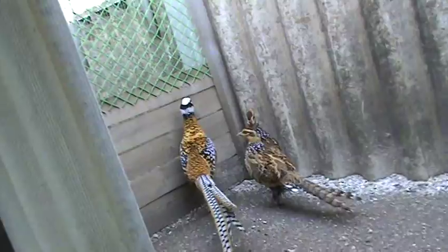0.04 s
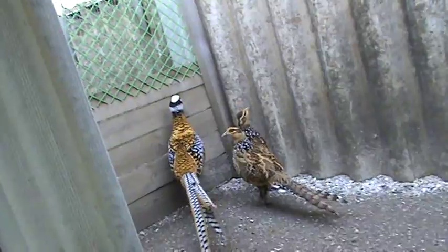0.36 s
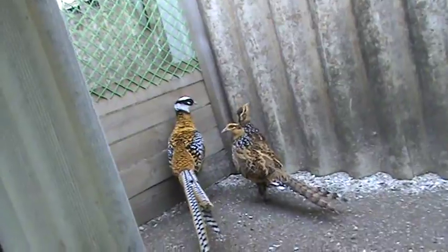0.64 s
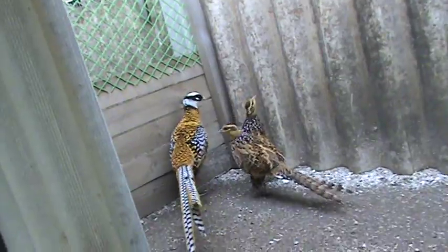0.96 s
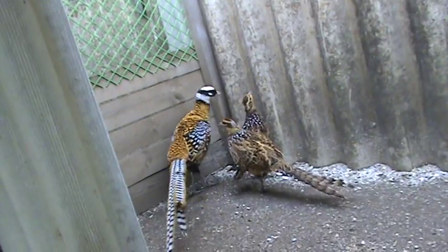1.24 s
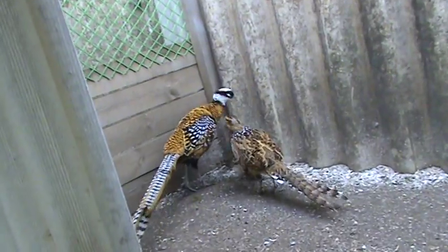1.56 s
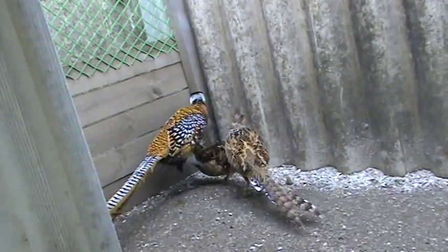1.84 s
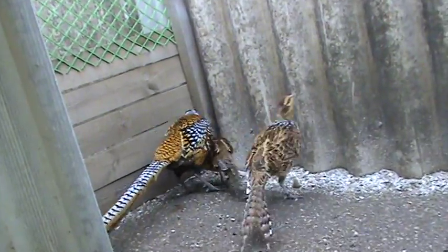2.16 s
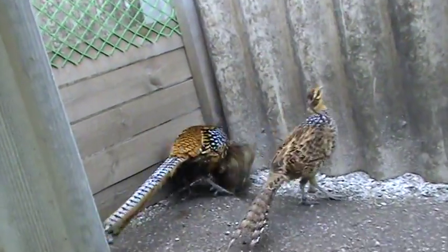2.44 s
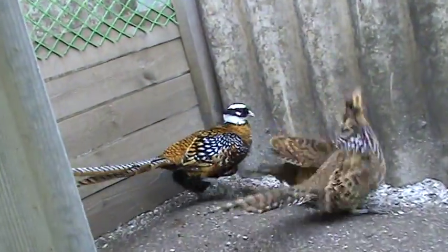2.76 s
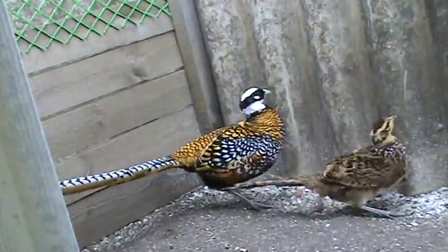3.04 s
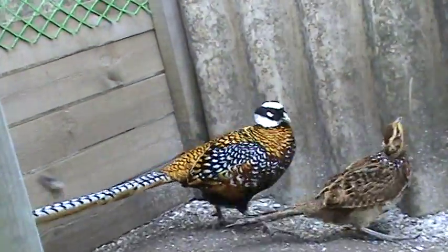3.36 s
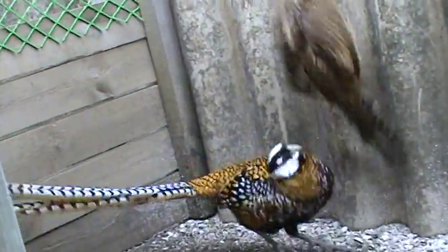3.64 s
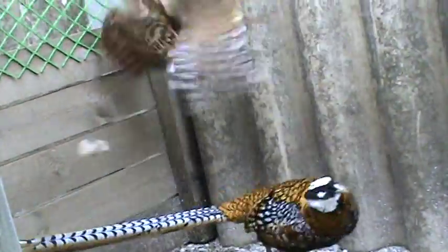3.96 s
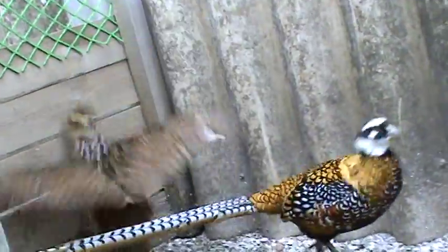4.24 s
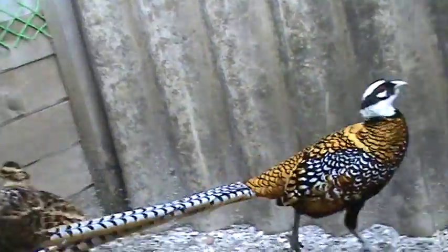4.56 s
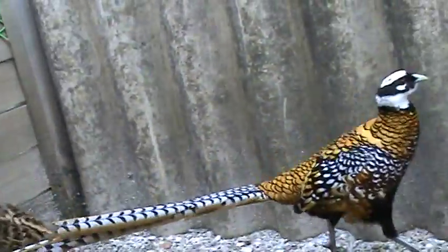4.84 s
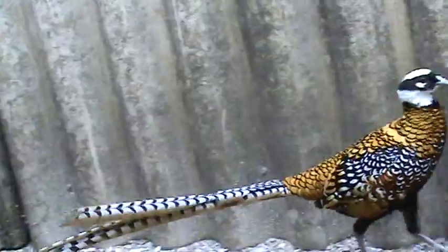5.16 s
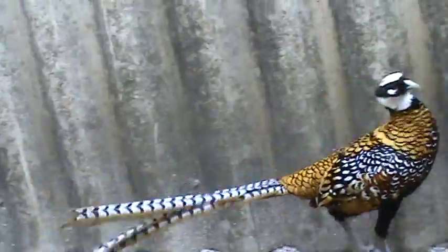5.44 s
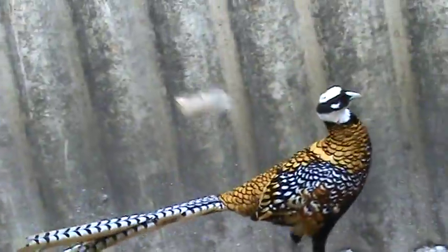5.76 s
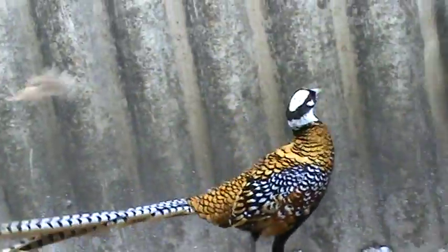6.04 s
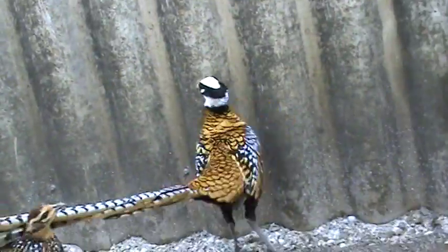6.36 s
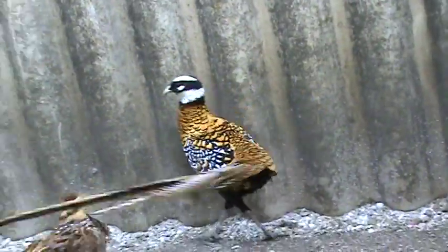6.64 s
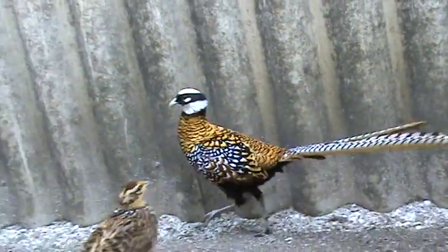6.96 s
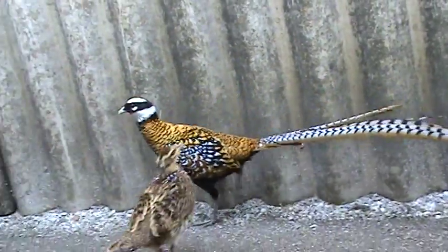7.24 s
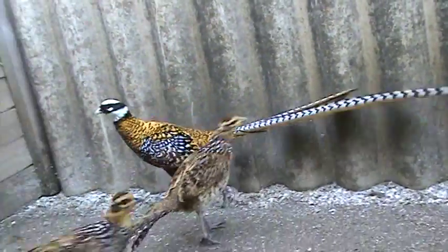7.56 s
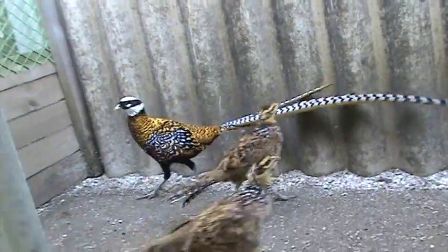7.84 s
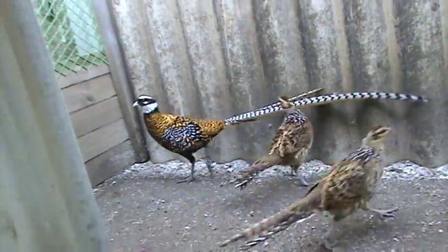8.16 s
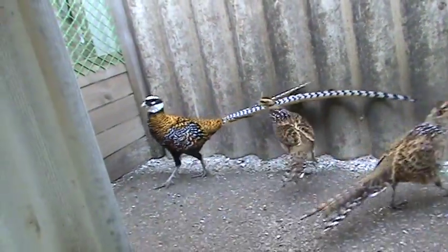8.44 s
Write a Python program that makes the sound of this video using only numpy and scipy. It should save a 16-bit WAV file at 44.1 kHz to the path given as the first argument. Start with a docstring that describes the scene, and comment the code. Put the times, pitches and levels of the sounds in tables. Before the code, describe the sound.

Over quiet outdoor background noise, a few low pheasant clucks and light gritty steps are heard close by. Then wings burst into beating, feathers brushing and knocking dully against board and sheet walls while the birds whine and squeal. As the scuffle dies down, a run of shrill, whistling alarm chirps takes over and continues to the end, each echoing briefly in the small pen.

```python
"""Pheasants call and scuffle in a small pen of boards and corrugated sheet. After soft coos, clucks and
steps on grit a hen flies up, wings beating against the walls, and ragged whines give way to a run of
sharp alarm chirps. Each chirp is one whistle of the syrinx that shoots up, drops to a low note and flicks
up again; the close walls ring with it. Wings and claws are shaped noise, the struck wall a short boom of
its modes, all over a faint outdoor bed."""
import sys
import numpy as np
from scipy import signal
from scipy.fft import rfft, irfft, next_fast_len
from scipy.io import wavfile
from scipy.ndimage import uniform_filter1d, minimum_filter1d, map_coordinates

SR = 44100
rng = np.random.default_rng(int(sys.argv[2]) if len(sys.argv) > 2 else 0)


def dump_mix(stems):
    """Bounce the given channels to the path in sys.argv[1] as a 16-bit WAV at rate SR."""
    frames = np.atleast_2d(stems).T  # one column per channel
    limited = np.clip(frames, -1, 1)  # hard clip at full scale
    pcm = np.round(limited * 32767).astype(np.int16)
    wavfile.write(sys.argv[1], SR, pcm)


N = 378819
BAND_LIMIT_HZ = 15950


def amp(db):
    """Decibels to gain."""
    return 10 ** (np.asarray(db) / 20)


def along(points, hz):
    """A curve of (Hz, value) points, read on a log frequency axis."""
    freqs, values = np.transpose(points)
    return np.interp(np.log(hz + 1), np.log(freqs + 1), values)


def wobble(rate, n):
    """A smooth random curve, rate knots a second."""
    return map_coordinates(rng.standard_normal(int(n * rate / SR) + 4), [np.arange(n) * rate / SR])


def filtered(x, response):
    """Shapes x with a frequency response."""
    n = x.shape[-1]
    size = next_fast_len(n + 4096)
    return irfft(rfft(x, size) * response(np.fft.rfftfreq(size, 1 / SR)), size)[..., :n]


def noise(spectrum, n, grain_db=0):
    """Coloured noise of rms 1; grain_db clumps it into tiny crackles."""
    grains = rng.standard_normal(n) * amp(grain_db * wobble(900, n))
    coloured = filtered(grains, lambda hz: amp(along(spectrum, hz)))
    return coloured / np.sqrt(np.mean(coloured ** 2) + 1e-20)


def swells(rows, settle_db_per_s=80):
    """Envelope of overlapping swells: each rises, holds and settles."""
    t = np.arange(N) / SR
    each = [np.clip((t - start) / rise, 0, 1)
            * amp(db - settle_db_per_s * np.maximum(t - start - rise - hold, 0))
            for start, rise, hold, db in rows]
    return np.linalg.norm(each, axis=0)


def add(track, start_s, sound):
    """Mixes a sound into the track."""
    part = track[..., round(start_s * SR):][..., :sound.shape[-1]]
    part += sound[..., :part.shape[-1]]


# Reverb decay of the pen: freq_hz, t60_s
PEN_DECAY = [(150, 0.27), (500, 0.27), (1500, 0.32), (4500, 0.25), (8000, 0.19), (15000, 0.25)]


def in_pen(x, wet_db, side_db=-9, gap_s=0.0022, early_db=4, early_s=0.028):
    """Mid and side of a sound with fresh echoes for its spot; near walls answer first and loudest."""
    hz, t, spectra = signal.stft(rng.standard_normal((2, SR // 2)), SR, nperseg=256)
    decay = amp(early_db * np.exp(-(t / early_s) ** 2) - 60 * t / along(PEN_DECAY, hz)[:, None])
    tail = signal.istft(spectra * decay, SR, nperseg=256)[1]
    tail *= np.clip(np.arange(tail.shape[1]) / SR / gap_s - 1, 0, 1)
    tail *= amp(wet_db + np.array([[0], [side_db]])) / np.linalg.norm(tail[0])
    tail[0, 0] += 1  # direct sound
    return signal.fftconvolve(x[None], tail, axes=1)


def wide_noise(spectrum, side_db):
    """A noise bed as mid and side."""
    return np.array([noise(spectrum, N), amp(side_db) * noise(spectrum, N)])


# Fader moves of the outdoor bed: time_s, murmur_db, hiss_db
BED_LEVELS = [(0, -61, -70), (.6, -56, -65.5), (1.2, -57, -56), (1.7, -55, -54.5), (2.25, -54, -60.5),
              (5.8, -46.5, -51), (6.7, -49, -51.5), (7.5, -52.5, -56.5), (8.59, -50.5, -54.5)]
# Colours of the murmur and the hiss: freq_hz, density_db
MURMUR_COLOUR = [(40, -27), (70, 0.5), (110, -7.5), (160, -1.5), (220, -5), (330, 0.5), (600, -4),
                 (1000, -7.5), (1600, -10.5), (2500, -17.5), (4000, -24.5), (7000, -89)]
HISS_COLOUR = [(1470, -1), (2500, 1), (2830, -2.5), (3720, 1), (3980, 1), (10400, -9.5), (16000, -20)]


def outdoor_bed():
    """A low, drifting outdoor murmur under a faint hiss."""
    t = np.arange(N) / SR
    times, *levels_db = np.transpose(BED_LEVELS)
    murmur, hiss = [amp(np.interp(t, times, db, right=-120)) for db in levels_db]
    murmur *= amp(1.2 * wobble(9, N))
    return murmur * wide_noise(MURMUR_COLOUR, side_db=-23) + hiss * wide_noise(HISS_COLOUR, side_db=-7)


# Puffs of air on the microphone: start_s, rise_s, hold_s, relative_db
PUFFS = [(.48, 0.052, 0.25, -63), (3.45, 0.049, 0.084, -44), (4.42, 0.072, 0.11, -42),
         (4.97, 0.031, 0.18, -39), (5.82, 0.04, 0.065, -47.5), (6.28, 0.042, 0.04, -46)]
# Colour of their rumble: freq_hz, density_db
RUMBLE_COLOUR = [(11, -37), (18, 2), (140, 8), (180, -12), (310, -120)]


def draught():
    """Moving air rumbles on the microphone, most of it fanned by the wings."""
    fanned = amp(-40.5) * (swells(FLAPPING) / amp(FULL_EFFORT_DB)) ** 0.6
    calm = amp(-67.5)
    airflow = np.sqrt(fanned ** 2 + swells(PUFFS) ** 2 + calm ** 2)
    buffeting = amp(2 * wobble(12, N) - 1)
    return airflow * buffeting * wide_noise(RUMBLE_COLOUR, side_db=-6)


# Resonances of the windpipe and beak: freq_hz, gain_db
THROAT_EQ = [(300, 14), (700, -6.5), (950, -6), (1500, 0.5), (1900, -0.5), (2700, -6.5), (3500, -0.5),
             (4200, 4.5), (5500, -4.5), (6900, 0), (8000, 5), (9500, -6), (12000, -3), (15000, -19)]
# Colour of the rasp in the voice: freq_hz, density_db
RASP_COLOUR = [(700, -59), (1300, 4), (1900, 11), (2700, -2), (4300, 21.5), (5400, -10), (6400, -3),
               (7900, 11.5), (9500, -28), (12000, 4.5), (14000, -18), (16000, -30)]


def whistle(hz, rough, overtone_db, slope_db, flutter=0.109, rasp_db=-12, mellow_db=-8):
    """The syrinx: a tone with overtones through the throat; roughness shakes it and adds rasp."""
    n = len(hz)
    hz = hz * np.exp(flutter * rough * wobble(900, n))
    phase = 2 * np.pi * np.cumsum(hz) / SR
    pressure = np.clip(hz / 2200, 0, 1) ** 2  # low notes are blown softly and stay mellow
    harmonic = np.arange(1, 7)[:, None]
    rolloff_db = overtone_db + slope_db * (harmonic - 2) + mellow_db * (1 - pressure)
    level_db = along(THROAT_EQ, harmonic * hz) + (harmonic > 1) * rolloff_db
    tone = np.sum(amp(level_db) * (harmonic * hz < BAND_LIMIT_HZ) * np.sin(harmonic * phase), axis=0)
    rasp = amp(rasp_db) * rough * pressure * noise(RASP_COLOUR, n, grain_db=-17)
    return np.sqrt(2) * tone + rasp


# Soft coos and peeps: start_s, length_s, from_hz, to_hz, relative_db
COO_CUES = [(0.107, 0.04, 335, 293, -64), (.49, 0.06, 784, 760, -45), (0.586, 0.057, 350, 298, -55.5),
            (0.922, 0.055, 340, 295, -54), (1.308, 0.049, 322, 304, -55), (1.745, 0.14, 381, 464, -53.5),
            (1.818, 0.092, 1740, 1730, -54), (2.25, 0.047, 1485, 1680, -47.5),
            (6.661, 0.091, 770, 768, -33), (8.07, 0.12, 672, 634, -40), (8.17, 0.062, 2220, 2530, -40)]


def coos(waver=0.008):
    """Gently blown notes that glide, swell and fade."""
    out = np.zeros((2, N))
    for start, length, from_hz, to_hz, db in COO_CUES:
        progress = np.linspace(0, 1, round(length * SR))
        hz = (from_hz + (to_hz - from_hz) * progress) * np.exp(waver * wobble(135, len(progress)))
        voice = whistle(hz, rough=0.32, overtone_db=-16.5, slope_db=-4)
        envelope = np.sqrt(abs(np.sin(np.pi * progress))) * amp(db - 7.5)
        add(out, start, in_pen(voice * envelope, wet_db=-2.5))
    return out


# Claws and beaks on grit and boards, and hard bumps in flight: start_s, tick_db, knock_db
STEP_CUES = [(.241, -61, -45), (1.085, -51.5, -70), (1.533, -35, -42.5), (2.323, -45.5, -35.5),
             (2.438, -40, -39.5), (2.475, -29, -32), (4.3, -26, -35), (4.409, -33, -18.5),
             (4.789, -37, -30), (7.135, -58, -43), (8.404, -49, -42)]
# Bright scrape of claws and feathers: freq_hz, density_db
SCRAPE_COLOUR = [(200, -14), (800, 0), (1500, 1), (3000, -4.5), (5000, -4), (8000, -6), (12000, -12.5),
                 (16000, -20.5)]
# Dull body of knocks and of air pushed by wings: freq_hz, density_db
DULL_COLOUR = [(29, -48), (50, -30), (125, -5.5), (176, 5.5), (214, 0.5), (361, 1), (622, 1.5), (678, -2.5),
               (960, -2.5), (1800, -3.5), (9000, -23), (11700, -53), (19800, -120)]


def steps():
    """Each contact is a gritty tick with a dull knock under it."""
    out, t = np.zeros((2, N)), np.arange(SR // 8) / SR
    for start, tick_db, knock_db in STEP_CUES:
        tick = amp(tick_db) * noise(SCRAPE_COLOUR, len(t), grain_db=4) * np.exp(-t / 0.016)
        knock = amp(knock_db) * noise(DULL_COLOUR, len(t)) * np.exp(-t / 0.015)
        add(out, start, in_pen(tick + knock, wet_db=0))
    return out


USUAL_TOP_HZ = 5468  # a chirp that peaks higher lasts longer and has a louder crest


def chirp_contour(top_hz, low_hz, rise_db, rough):
    """The gesture of one chirp, as columns: share_of_length, pitch_hz, relative_db."""
    top_db = rise_db + 13.5 * np.log2(top_hz / USUAL_TOP_HZ) + 5 * (0.5 - rough)
    # the low note fades when it is very deep or the voice is rough
    low_db = rise_db + 1 + 28.5 * min(0, np.log2(low_hz / 562)) - 7.5 * rough
    flick_db = min(rise_db, top_db) - 5.5
    onset = [(-.42, .9 * low_hz, low_db - 31), (-.27, low_hz, low_db - 21), (-.18, 950, rise_db - 25)]
    rise = [(-.09, 1201, rise_db - 4), (0, min(1600, top_hz), rise_db - 5),
            (.06, min(1950, top_hz), rise_db - .5),
            (.125, max(.73 * top_hz, min(2100, top_hz)), top_db - 3.5)]
    crest = [(.2, .93 * top_hz, top_db - .5), (.3, top_hz, top_db), (.4, .93 * top_hz, top_db - 2.5)]
    drop = [(.48, min(1900, .806 * top_hz), top_db - 13), (.54, .97 * low_hz, low_db - 15.5)]
    low_note = [(.69, low_hz, low_db), (.82, 1.2 * low_hz, low_db - 14.5)]
    flick = [(.9, 1094, flick_db - 2), (.97, 1440, flick_db),
             (1.1, 1700, flick_db - 10), (1.3, 1490, flick_db - 44)]
    return np.transpose(onset + rise + crest + drop + low_note + flick)


# Clucks, then alarm chirps: start_s, top_hz, low_hz, relative_db, roughness (0-1)
CHIRP_CUES = [(.706, 1494, 581, -33, 0.26), (0.995, 1710, 601, -31.5, 0.48), (1.297, 1393, 583, -33, 0.25),
              (2.878, 1442, 604, -18.5, 0.37), (3.081, 3880, 590, -30.5, 0.55),
              (3.286, 4650, 618, -22, 0.26), (3.452, 5890, 1132, -26.5, 0.42),
              (4.456, 6900, 467.4, -17, 0.34), (4.639, 7090, 1298, -17.5, .4),
              (4.811, 7050, 1127, -16, 0.53), (4.951, 6840, 1287, -18.5, .6),
              (5.487, 6010, 371, -17.5, 0.61), (5.667, 5790, 637, -23, 0.62), (5.823, 6120, 490, -18, 0.48),
              (5.977, 5445, 367, -20.5, 0.41), (6.124, 6500, 406, -20, 0.66),
              (6.282, 5980, 430, -17.5, 0.65), (6.447, 6010, 399.5, -18, 0.6),
              (6.625, 6050, 387.5, -15.5, 0.77), (6.804, 5050, 447, -19, 0.51),
              (6.976, 4510, 488.5, -15, 0.41), (7.217, 5256, 515.4, -16.5, 0.32),
              (7.441, 5360, 501, -15, .33), (7.68, 4817, 487, -15.5, 0.32), (7.882, 4980, 541, -17.5, 0.41),
              (8.261, 5420, 432, -17.5, 0.5), (8.488, 4850, 516, -16.5, 0.37)]
# Grating colour of a rough voice before it leaps: freq_hz, density_db
GRATE_COLOUR = [(900, -48), (1350, -7), (1800, 3), (2200, -8), (2900, -22)]


def chirps(slip=0.1, stumble=0.251, lead_s=0.025):
    """One fast whistle per call, with a hoarse edge ahead of it and a grate and crack as it leaps."""
    out, n = np.zeros((2, N)), SR // 8
    for start, top_hz, low_hz, rise_db, rough in CHIRP_CUES:
        length = 0.049 * (top_hz / USUAL_TOP_HZ) ** 0.33
        progress = (np.arange(n) / SR - lead_s) / length
        bump = lambda centre, width: np.exp(-((progress - centre) / width) ** 2)
        share, hz, db = chirp_contour(top_hz, low_hz, rise_db, rough)
        pitch = np.exp(np.interp(progress, share, np.log(hz)))
        # a rough voice keeps slipping down, and stumbles on the way up
        pitch *= np.exp(-slip * rough * np.clip(pitch / 4000, 0, 1) * wobble(260, n) ** 2)
        pitch *= np.exp(stumble * rough * bump(0, 0.2005) * wobble(450.7, n))
        # a clear voice has shrill overtones
        voice = whistle(pitch, rough, overtone_db=-8 - 8.8 * rough, slope_db=-1.5, rasp_db=-15.5)
        voice *= amp(np.interp(progress, share, db, left=-120, right=-120) - 1.5)
        crest_db = np.interp(0.3, share, db)
        crack = amp(crest_db - 8) * bump(0.15, 0.2) * noise(RASP_COLOUR, n, grain_db=4)
        crack *= min(1, top_hz / 5000) ** 2  # low clucks barely crack
        edge = amp(rise_db - 30.5) * rough * bump(-0.38, 0.15) * noise(RASP_COLOUR, n)
        grate = amp(rise_db - 3) * rough * bump(0.09, 0.095) * noise(GRATE_COLOUR, n)
        add(out, start - lead_s, in_pen(voice + crack + edge + grate, wet_db=-0.5))
    return out


def grit(start_s=1.54, spread_s=0.12, ring_s=0.0043, stones=45):
    """A scratching foot scatters tiny stones, which tinkle ever more sparsely."""
    out, t = np.zeros(N), np.arange(SR // 40) / SR
    for lateness, softness, tone in rng.random((stones, 3)):
        ping = np.sin(2 * np.pi * (7625 + 6250 * tone) * t) * np.exp(-t / ring_s)
        landing_s = start_s - spread_s * np.log(1 - 0.95 * lateness)
        add(out, landing_s, amp(-47 - 5.1 * softness - 6 * lateness) * ping)
    return in_pen(out, wet_db=3)[:, :N]


# Bouts of flapping: start_s, rise_s, hold_s, effort_db
FLAPPING = [(2.47, 0.025, 0.046, -31.5), (2.88, .04, .03, -32.5), (3.0, 0.039, 0.41, -41.5),
            (3.42, 0.55, .13, -21), (4.05, 0.073, 0.24, -28), (4.47, 0.027, 0.058, -30.5),
            (4.96, 0.19, 0.085, -25), (5.46, 0.029, 0.081, -41.5)]
# Wing strokes that brush a wall or the ground: start_s, feather_db, length_s
STROKE_CUES = [(2.469, -29.5, 0.046), (2.508, -26, 0.02), (2.581, -47, .029), (2.674, -31, 0.028),
               (2.914, -26, 0.02), (3.04, -32, 0.024), (3.239, -34, 0.12), (3.43, -27, 0.055),
               (3.515, -20.5, 0.017), (3.592, -18.5, 0.023), (3.666, -17.5, 0.043), (3.908, -29, 0.017),
               (3.943, -27.5, 0.047), (4.051, -16.5, 0.031), (4.145, -19, 0.023), (4.198, -15.5, 0.0098),
               (4.288, -21.5, 0.059), (4.407, -27, 0.011), (4.787, -30, 0.015), (5.166, -22, 0.011),
               (5.226, -10, 0.019), (5.285, -20, 0.041), (5.341, -24, 0.036)]
FULL_EFFORT_DB = -27  # plumage and draught grow more slowly than the effort around this level


def wings(push_db=-2, churn_db=-1):
    """Each stroke slaps and drags stiff feathers; with the effort, air churns and plumage rustles."""
    out, t = np.zeros((2, N)), np.arange(SR // 6) / SR
    effort = swells(FLAPPING)
    for start, feather_db, length in STROKE_CUES:
        drag = (1 - np.exp(-t / 0.0015)) * np.exp(-(t / length) ** 2)
        feathers = amp(feather_db) * noise(SCRAPE_COLOUR, len(t), grain_db=4)
        push = amp(push_db) * effort[round(start * SR)] * noise(DULL_COLOUR, len(t), grain_db=4)
        add(out, start, in_pen(drag * (feathers + push), wet_db=-6.5))
    churn = effort * amp(churn_db + 1.2 * wobble(35, N)) * noise(DULL_COLOUR, N, grain_db=3)
    rustle = (effort / amp(FULL_EFFORT_DB)) ** 0.66
    plumage = rustle * amp(-34 + 4.3 * wobble(60, N)) * noise(SCRAPE_COLOUR, N, grain_db=1)
    add(out, 0, in_pen(churn + plumage, wet_db=-6.5))
    return out


# Modes of the pen wall: pitch_hz, level_db, uncapped_t60_s
WALL_MODES = [(283.5, -1, 5.0), (314.5, -10, 0.7), (423, -6.5, 5.0), (488.5, -5, 5.0), (682.3, -4.5, 0.59),
              (836, -1, 0.047)]
# Wings and bodies hitting the wall: start_s, relative_db
THUMP_CUES = [(2.475, -29), (2.519, -19.5), (2.885, -34), (2.931, -29), (3.86, -17), (3.975, -17.5),
              (4.059, -20), (4.337, -18.5), (4.407, -18.5), (4.491, -20), (4.574, -27.5), (5.262, -21.5)]


def thumps(max_t60_s=0.14, detune=0.0542):
    """Soft blows make the wall boom briefly, its modes at new strengths and tunings each time."""
    out, t = np.zeros((2, N)), np.arange(SR // 4) / SR
    hz, mode_db, t60 = np.transpose(WALL_MODES)[:, :, None]
    attack = 1 - np.exp(-t / 0.00081)
    for start, db in THUMP_CUES:
        strength, tuning = rng.standard_normal((2, len(WALL_MODES), 1))
        decay = amp(mode_db + 1.7 * strength - 60 * t / np.minimum(t60, max_t60_s))
        boom = attack * np.sum(decay * np.sin(2 * np.pi * hz * (1 + detune * tuning) * t), axis=0)
        add(out, start, in_pen(amp(db + 1) * boom / np.max(abs(boom)), wet_db=-1.5))
    return out


# Stuttering whines and squeals: start_s, length_s, pitch_hz, relative_db
WHINE_CUES = [(3.07, 0.025, 1338, -18.5), (3.275, 0.035, 1405, -8.5), (3.48, 0.18, 1342, -14),
              (3.685, 0.037, 1540, -15), (3.974, 0.028, 4600, -18.5), (4.001, .036, 1620, -17.5),
              (4.176, 0.039, 1400, -13), (4.317, 0.062, 1500, -14.5), (4.477, 0.059, 1770, -13.5),
              (4.692, 0.033, 1450, -14.5), (4.852, 0.0305, 3400, -14.5), (4.973, 0.12, 1500, -16.5),
              (5.074, 0.14, 1381, -12), (5.059, 0.034, 4100, -22), (5.125, 0.056, 4750, -16),
              (5.33, 0.066, 1400, -14.5), (6.329, 0.018, 8350, -28), (7.717, 0.033, 1575, -15.5),
              (7.926, 0.025, 1408, -18.5), (8.526, 0.025, 1500, -15)]


def whines(syllable_s=0.04, scoop_hz=148, stray_hz=110, waver_hz=170, gap_db=-12.5, throb_db=4):
    """Ragged syllables, each sagging in pitch as it swells; pitch and strength waver together."""
    out = np.zeros((2, N))
    for start, length, pitch, db in WHINE_CUES:
        t = np.arange(round(length * SR)) / SR
        swell = np.sin(np.pi * t / min(syllable_s, length)) ** 2
        strain = np.tanh(wobble(150, len(t)))
        loose = min(1, 1500 / pitch)  # high squeals are held more steadily
        stray = stray_hz * wobble(1 / syllable_s, len(t))
        hz = pitch + scoop_hz * (0.5 - swell) + stray + waver_hz * loose * strain
        voice = whistle(hz, rough=0.824 * loose, overtone_db=-12.5, slope_db=-2.5)
        fade = np.clip(np.minimum(t, length - t) / 0.005, 0, 1)
        level = amp(db - 5.5 + gap_db * (1 - swell) + throb_db * strain)
        add(out, start, in_pen(voice * fade * level, wet_db=-5))
    return out


# Phase between the microphone ports: freq_hz, left_lead_rad
PORT_PHASE = [(20, 0.19), (100, -0.24), (250, -1.02), (450, -1.14), (1000, -0.97), (2000, -0.66),
              (4000, -0.64), (7000, 0.5), (15000, 0.28)]
# Balance between the ports: freq_hz, left_minus_right_db
PORT_BALANCE = [(60, -0.5), (110, 0), (200, -0.5), (380, -1), (700, -1), (1290, -1.5), (2380, -1),
                (4400, -3.5), (8120, -2.5), (15000, 0.5)]


def scene():
    """All sources at a close pair of microphone ports, each with its own phase and colour."""
    voices = chirps() + coos() + whines()
    scuffle = wings() + thumps() + steps() + grit()
    mid, side = voices + scuffle + outdoor_bed() + draught()
    sign = np.array([[1], [-1]])  # left, right
    half_lead = lambda hz: np.clip(along(PORT_PHASE, hz) / 2, -1, 1)
    ports = lambda hz: amp(sign * along(PORT_BALANCE, hz) / 2) * (1 + 1j * sign * np.tan(half_lead(hz)))
    return filtered(mid + sign * side, ports)


def record(dry, ceiling_db=-14):
    """The camera's gain control holds down the loudest moments; nothing passes above its band limit."""
    level = np.sqrt(abs(uniform_filter1d(np.mean(dry ** 2, axis=0), size=130)) + 1e-12)
    needed = np.minimum(1, amp(ceiling_db) / level)
    gain = uniform_filter1d(minimum_filter1d(needed, size=300), size=300)
    return filtered(dry * gain, lambda hz: hz < BAND_LIMIT_HZ)


dry = scene()
out = record(dry)
dump_mix(out)
```